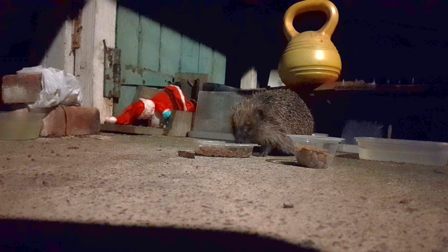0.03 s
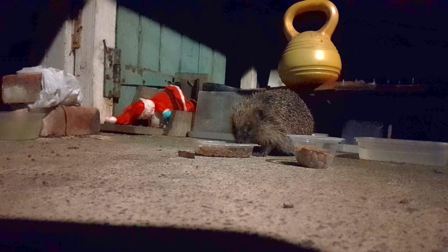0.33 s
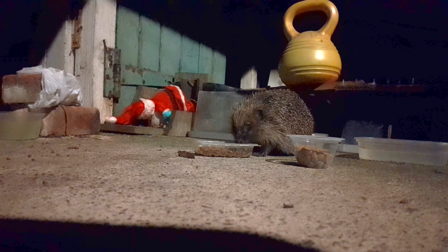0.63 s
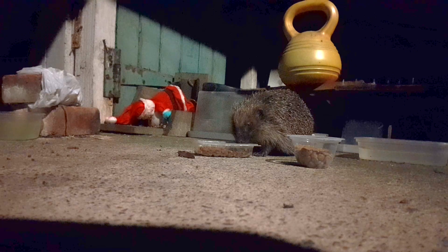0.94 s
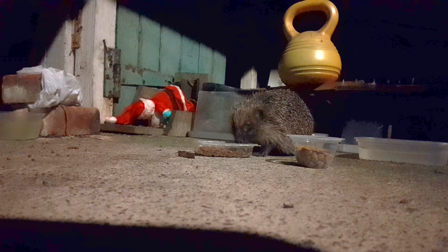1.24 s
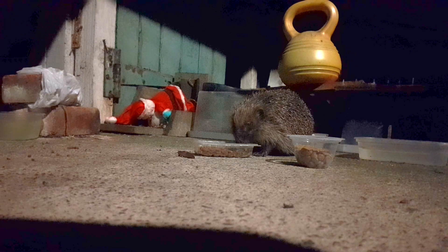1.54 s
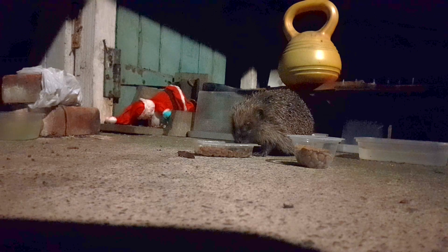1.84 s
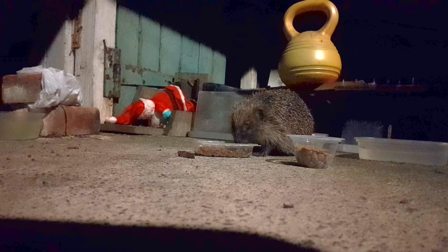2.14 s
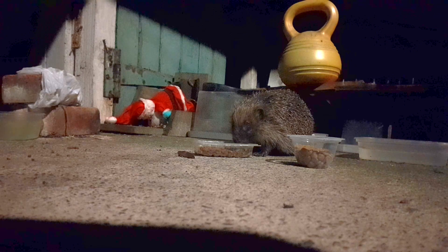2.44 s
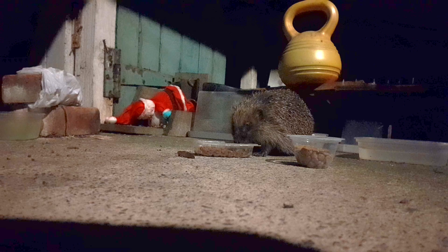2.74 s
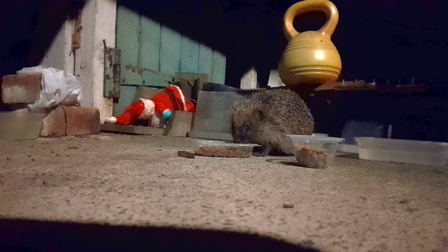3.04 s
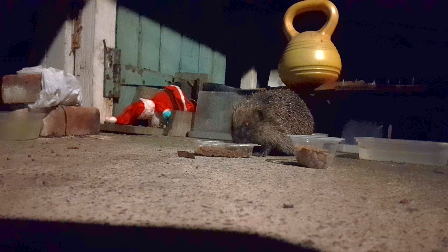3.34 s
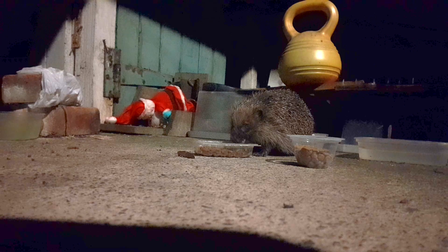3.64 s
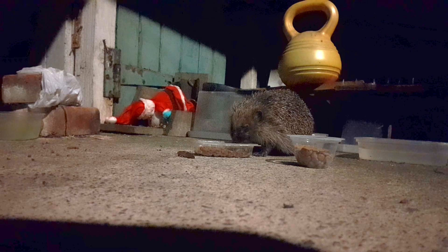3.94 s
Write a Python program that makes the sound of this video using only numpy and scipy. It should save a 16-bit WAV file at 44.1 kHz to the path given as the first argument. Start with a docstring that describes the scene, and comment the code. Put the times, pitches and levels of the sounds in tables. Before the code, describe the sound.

A hedgehog chews dry biscuit in faint, irregular bites, mixing tiny brittle cracks with soft crumbly chews. It is about a metre from a ground-level microphone on a patio at night, over a dull, wavering rumble and slight hiss.

```python
"""A hedgehog chews dry biscuit on a patio at night, about a metre from a camera microphone on the ground.
Each bite is a few tiny brittle cracks or a soft crumbly chew, some with a fine crackle of powder;
the paving mirrors them and the walls around echo them. Underneath, a dull outdoor rumble swells
and fades, booming in three low resonances, with one soft bump and faint microphone hiss."""
import sys
import numpy as np
from scipy import signal
from scipy.fft import rfft, irfft
from scipy.io import wavfile

SR = 44100
rng = np.random.default_rng(int(sys.argv[2]) if len(sys.argv) > 2 else 0)


def pcm_store(signal):
    """Save signal as 16-bit PCM."""
    levels = np.round(np.clip(np.atleast_2d(signal), -1, 1) * 32767)
    wavfile.write(sys.argv[1], SR, levels.astype(np.int16).T)


N = 176400

# swell of the outdoor rumble: t/s, level/dB
RUMBLE_SWELL = [(0, -46.5), (.2, -50), (.33, -46.5), (.65, -47.5), (.9, -50.5), (1.05, -51), (1.27, -47),
                (1.369, -50), (1.48, -46), (1.78, -48), (1.931, -44), (2.12, -50.5), (2.27, -45),
                (2.45, -49), (2.78, -52), (3.1, -49.5), (3.34, -48), (3.6, -51.5), (3.82, -49),
                (3.94, -43.5), (4, -46.5)]
# colour of the rumble: f/Hz, relative level/dB
RUMBLE_COLOUR = [(22, -42), (42, -17.5), (60, -10), (85, -4.5), (120, 0.5), (190, 4), (240, -1), (340, 2.5),
                 (450, -2), (580, -7), (720, -14.5), (900, -25.5), (1250, -40.5), (7000, -110)]
# stereo width of the rumble: f/Hz, side minus mid/dB
RUMBLE_WIDTH = [(30, -5.5), (70, -13), (130, -13), (280, -8.5), (500, -5.5), (850, -0.5)]
# its low resonances: f/Hz, half width/Hz, level against the resting swell/dB, growth/(dB per dB of swell)
RESONANCES = [(82.4, 12, -9, 1.46), (154.3, 6, -11, -0.3), (291.5, 15.9, -9, 2.17)]
# deep bass against the rest of the rumble: t/s, gain/dB
BASS_GAIN = [(0, 1.5), (.2, -14), (.35, 2.5), (1.25, 3), (1.8, 0.5), (2.55, 4), (3.1, 2.5), (3.65, -4),
             (4, -3)]
# top of the rumble against the rest: t/s, gain/dB
UPPER_GAIN = [(0, -4), (.45, -0.5), (.75, 2.5), (1.5, 0.5), (1.95, 2.5), (2.3, -3), (2.8, 1), (3.9, -0.5)]
# colour of the microphone hiss: f/Hz, relative level/dB
HISS_COLOUR = [(500, -15), (1500, 8), (2800, 4), (4500, 2), (6500, -3), (9500, -2), (12000, 2.5),
               (15500, 4)]
# soft chews: t/s, low ring level/dB, high ring f/Hz, high ring level/dB, fade time constant/s
SOFT_CHEWS = [(0.054, -70.5, 6700, -77.5, 0.031), (.149, -88, 7000, -75.5, 0.05),
              (0.345, -77, 6470, -78.5, 0.015), (.3732, -74.5, 6500, -82, .012),
              (0.9745, -78, 8100, -83, 0.0084), (1.0492, -68, 8240, -75.5, 0.023),
              (1.28, -75.5, 7100, -74, 0.025), (1.396, -76, 8400, -76, 0.037),
              (1.634, -84, 6980, -71.5, 0.032), (1.97, -77, 6300, -71.5, 0.045),
              (2.387, -70.5, 7500, -80.5, 0.034), (2.407, -80, 7000, -71.5, 0.039),
              (3.041, -75, 8200, -81, 0.036), (3.2377, -74, 8100, -73.5, 0.05),
              (3.36, -86, 4950, -73, .025)]
# colour of a chew's crumbly noise: f/Hz, relative level/dB
CHEW_COLOUR = [(2500, -18), (5000, -8), (8000, -2), (14000, -14)]
# one resonance droning out: middle t/s, half length/s, f/Hz, level/dB
DRONE_TONES = [(0.527, 0.16, 153.8, -48.5), (0.761, 0.057, 299.3, -52.5), (0.799, .09, 156.7, -53),
               (1.296, 0.053, 87.9, -48.5), (1.44, 0.05, 305, -54.5), (1.522, 0.065, 155, -49),
               (1.697, .1, 299.7, -50.5), (1.931, 0.097, 298, -40), (1.949, 0.05, 82.36, -45),
               (2.273, 0.049, 299, -40.5), (2.307, .093, 150.2, -44.5), (2.964, 0.087, 297.7, -52.5),
               (3.32, 0.077, 158.6, -53), (3.407, .055, 296.8, -50.5)]
# hard cracks of the biscuit: t/s, ring f/Hz, ring level/dB, snap f/Hz, snap level/dB, knock level/dB
BISCUIT_CRACKS = [ (0.6692, 4540, -68, 5450, -68, -74), (0.6915, 4700, -66.5, 8550, -65, -77),
                  (.8636, 3370, -76.5, 2500, -85, -72), (1.2795, 7300, -80, 5630, -73, -74),
                  (1.393, 3740, -72.5, 8400, -71, -81), (1.6613, 5250, -67.5, 7800, -71.5, -80),
                  (2.0251, 4970, -74, 8000, -69, -64.5), (2.0643, 5150, -61, 6400, -61.5, -62),
                  (2.2002, 4900, -57, 8450, -58, -96), (2.2005, 5930, -61.5, 10600, -61.5, -88),
                  (2.4656, 5900, -71, 7560, -70, -81), (2.4937, 5600, -56, 7160, -65, -73),
                  (2.52, 5200, -53.5, 6840, -69, -68), (2.619, 4680, -72, 5600, -84, -88),
                  (2.6483, 4170, -67.5, 9300, -73.5, -93), (2.911, 4700, -65.5, 3300, -81, -75.5),
                  (2.9615, 4400, -70.5, 9000, -76, -90), (3.3192, 3860, -75, 9600, -75, -83),
                  (3.3398, 4960, -68.5, 3400, -80, -78)]
# colour of a crack's low knock: f/Hz, relative level/dB
KNOCK_COLOUR = [(300, -3.5), (1150, 0.5), (1550, -3), (2300, 5), (3300, -8), (4500, -18), (15000, -34)]
# fine crackle of biscuit ground to powder: t/s, level/dB, fade time constant/s
CRACKLES = [(.7, -71, 0.033), (.9123, -70, .006), (1.41, -67, .045), (2.211, -65, 0.065),
            (2.494, -68, .025), (3.334, -67.5, 0.042)]
# colour of that crackle: f/Hz, relative level/dB
CRACKLE_COLOUR = [(3000, -28), (9000, -8), (12000, -5)]
# lean of the chewing at the microphone: f/Hz, left minus right/dB
CHEWING_PAN = [(2000, 7.5), (3600, 6.5), (5200, -9.5), (6800, -4), (8500, 8), (12000, -5.5)]


def undb(db):
    """Decibels to gain."""
    return 10 ** (np.asarray(db) / 20)


def unit(x):
    """Scale to rms 1."""
    return x / np.sqrt(np.mean(x ** 2))


def sized(x, db, window_s=.0036):
    """Give a short sound the energy of a steady one of this level lasting window_s."""
    energy = np.mean(np.sum(x ** 2, axis=-1))
    return x * undb(db) * np.sqrt(SR * window_s / energy)


def over_time(points):
    """Join (t/s, value) points by straight lines."""
    return np.interp(np.arange(N) / SR, *np.array(points).T)


def on_log(points, hz):
    """Read (f/Hz, value) points on a log-frequency axis."""
    freqs, values = np.array(points, float).T
    return np.interp(np.log(hz + 1), np.log(freqs), values)


def bins(size):
    """Frequencies in the spectrum of so many samples."""
    return np.arange(size // 2 + 1) * SR / size


def colour(x, points):
    """Filter by (f/Hz, gain/dB) points."""
    size = x.shape[-1]
    return irfft(rfft(x) * undb(on_log(points, bins(size))), size)


def around(x, hz, share):
    """Keep a band around one pitch, its width set as a share of that pitch."""
    detuning = (bins(x.shape[-1]) / hz - 1) / share
    return irfft(rfft(x) / (1 + detuning ** 2) ** 1.5)


def narrow(hz, width_hz):
    """Noise ringing in one resonance."""
    detuning = (bins(N) - hz) / width_hz
    return unit(irfft(rfft(rng.standard_normal(N)) / (1 + detuning ** 2), N))


def add(track, start_s, sound):
    """Mix a short sound into a track."""
    i = max(int(start_s * SR), 0)
    track[..., i:i + sound.shape[-1]] += sound[..., :max(N - i, 0)]


def rumble(trim_db=-1.44, rest_db=-49, lean_db=0.7, bass_hz=114, upper_hz=494):
    """Dull outdoor noise all around the patio; two of its three resonances grow faster than its swell."""
    swell_db = over_time(RUMBLE_SWELL)
    left_right = np.array([[1], [-1]])
    mid, side = (unit(colour(rng.standard_normal(N), RUMBLE_COLOUR)) for _ in range(2))
    out = undb(swell_db + trim_db) * (mid + left_right * colour(side, RUMBLE_WIDTH))
    for hz, width_hz, db, growth in RESONANCES:
        out += narrow(hz, width_hz) * undb(rest_db + db + growth * (swell_db - rest_db))
    bass, below_upper = (irfft(rfft(out) / (1 + (bins(N) / hz) ** 8), N) for hz in (bass_hz, upper_hz))
    middle, upper = below_upper - bass, out - below_upper
    out = bass * undb(over_time(BASS_GAIN)) + middle + upper * undb(over_time(UPPER_GAIN))
    return out * undb(left_right * lean_db / 2)


def microphone_hiss(db=-76.5):
    """The microphone's own steady noise, separate in each channel."""
    return undb(db) * unit(colour(rng.standard_normal((2, N)), HISS_COLOUR))


def thump(middle_s=0.044, half_s=0.011, hz=335, db=-42):
    """One soft, dull bump of a few low cycles, dead centre."""
    t = np.arange(N) / SR - middle_s
    return undb(db) * np.exp(-(t / half_s) ** 2) * unit(np.cos(2 * np.pi * hz * t))


def ring(hz, decay_s):
    """A bit of biscuit resonates, swelling within a few cycles and dying away."""
    t = np.arange(1024) / SR
    return t * np.exp(-t / decay_s) * np.sin(2 * np.pi * hz * t)


def chew(hz, db, fade_s, grains=8, ring_s=0.00028, pitch_spread=0.16, grain_db=-1):
    """A soft bite: a tick and a few fading grains after it, all ringing near one pitch."""
    out = np.zeros((2, N))
    add(out, 0, ring(hz, ring_s))
    for when, left, right in rng.random((grains, 3)):
        delay = 2 * fade_s * when
        grain = np.array([ring(hz * (1 + pitch_spread * (draw - .5)), ring_s) for draw in (left, right)])
        add(out, delay, grain * undb(grain_db) * np.exp(-delay / fade_s))
    return sized(out[:, :SR // 4], db)


def grind(db, fade_s, spectrum, roughness=0.77):
    """Crumbs ground between the teeth: a dense patter of uneven specks that fades away."""
    t = np.arange(SR // 4) / SR
    sizes = np.exp(roughness * np.repeat(rng.standard_normal(len(t) // 45), 45))  # about 1 ms a speck
    specks = rng.standard_normal((2, len(t))) * sizes * np.exp(-t / fade_s)
    return sized(colour(specks, spectrum), db)


def drones(wander_hz=1.98):
    """Now and then a low resonance of the rumble rises briefly to a wavering tone."""
    t, out = np.arange(N) / SR, 0
    for middle_s, half_s, hz, db in DRONE_TONES:
        pitch_hz = hz + wander_hz * narrow(0, width_hz=9.9)
        tone = unit(np.sin(2 * np.pi * np.cumsum(pitch_hz) / SR))
        out = out + undb(db) * np.exp(-((t - middle_s) / half_s) ** 2) * tone
    return out


def crack(hz, ring_db, snap_hz, snap_db, knock_db, burst_s=0.00019, ring_s=0.00031, edge_top_hz=12000):
    """Biscuit fractures, 1 ms in: a sharp edge, a ringing fragment, a bright snap and a low knock."""
    t, lead = np.arange(1024) / SR, SR // 1000
    bursts = rng.standard_normal((4, 2, len(t))) * t * np.exp(-t / burst_s)
    edge, grit, snap, knock = np.roll(bursts, lead, axis=-1)
    edge = colour(edge, [(hz / 2, -20), (hz, 0), (edge_top_hz, -3), (2 * edge_top_hz, -15)])
    tone = unit(np.roll(ring(hz, ring_s), lead))
    fragment = tone + 0.47 * unit(around(grit, hz, share=0.23))  # the ring is partly noise
    snap = around(snap, snap_hz, share=0.27)
    knock = colour(knock + knock[0], KNOCK_COLOUR)  # partly shared by both channels
    return (sized(edge, ring_db - 12.5) + sized(fragment, ring_db)
            + sized(snap, snap_db) + sized(knock, knock_db))


def hedgehog(low_ring_hz=3430, crumbs_per_s=14, crumb_hz=3070):
    """At the mouth: hard cracks, soft chews, powdery crackle and faint crumbs breaking at random."""
    out = np.zeros((2, N))
    for start, *fracture in BISCUIT_CRACKS:
        add(out, start - .001, crack(*fracture))
    for start, low_db, high_hz, high_db, fade_s in SOFT_CHEWS:
        rings = chew(low_ring_hz, low_db, fade_s) + chew(high_hz, high_db, fade_s)
        add(out, start, rings + grind(high_db + 0.5, fade_s, CHEW_COLOUR))
    for start, db, fade_s in CRACKLES:
        add(out, start, grind(db, fade_s, CRACKLE_COLOUR))
    for when, pitch, faintness in rng.random((int(crumbs_per_s * N / SR), 3)):
        db = -88 - 2 * np.log(max(faintness, .05))  # louder crumbs are rarer
        hz = crumb_hz * 2 ** (pitch - .5)
        add(out, when * N / SR, crack(hz, db, snap_hz=2 * hz, snap_db=db - 4, knock_db=db - 5.5))
    return out


def patio(x, bounce_s=.0015, bounce_db=-9, walls_t60_s=0.27, walls_onset_s=0.0046, walls_db=-2.5):
    """A metre away: the direct sound, a quick bounce off the paving and a diffuse echo from the walls."""
    lean_db = on_log(CHEWING_PAN, bins(N))
    direct = irfft(rfft(x) * undb(np.array([lean_db, -lean_db]) / 2), N)
    bounce = np.roll(direct, int(bounce_s * SR), axis=-1)
    t = np.arange(SR // 2) / SR
    envelope = np.exp(-np.log(1000) * t / walls_t60_s) * (1 - np.exp(-t / walls_onset_s))
    tail = unit(rng.standard_normal((2, len(t))) * envelope) / np.sqrt(len(t))
    walls = signal.fftconvolve(x, tail, axes=-1)[:, :N]
    return direct + undb(bounce_db) * bounce + undb(walls_db) * walls


def scene():
    """From ground level: the hedgehog on the patio, over hiss and the low sounds of the night."""
    return microphone_hiss() + rumble() + thump() + drones() + patio(hedgehog())


def record(dry, top_hz=15750):
    """The camera cuts the top steeply."""
    return signal.sosfilt(signal.ellip(10, .1, 70, top_hz, fs=SR, output="sos"), dry)


dry = scene()
out = record(dry)
pcm_store(out)
```